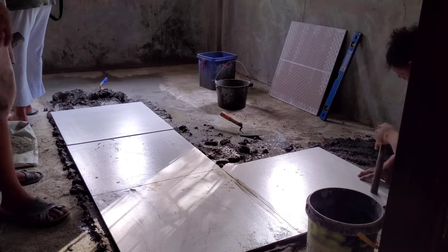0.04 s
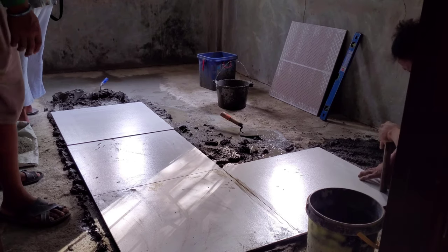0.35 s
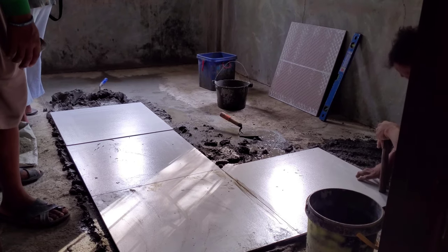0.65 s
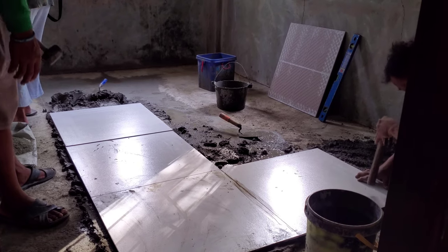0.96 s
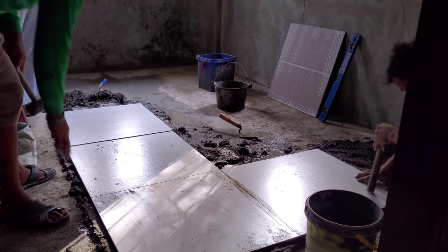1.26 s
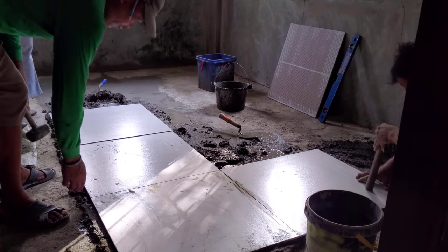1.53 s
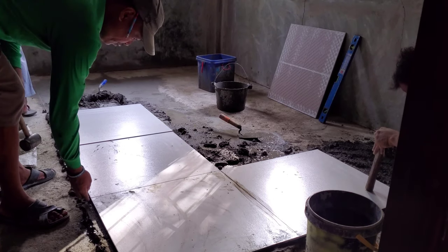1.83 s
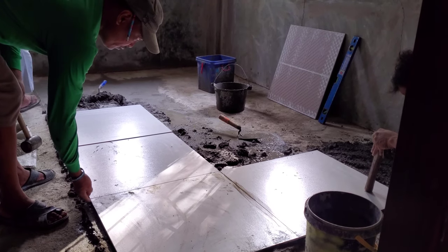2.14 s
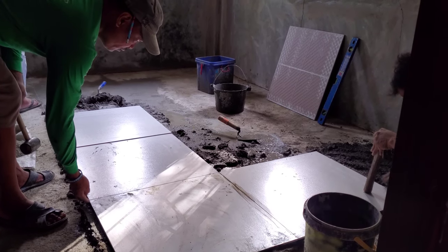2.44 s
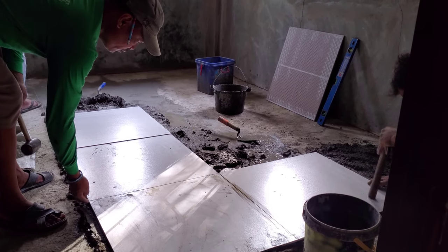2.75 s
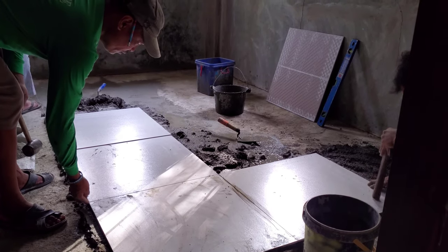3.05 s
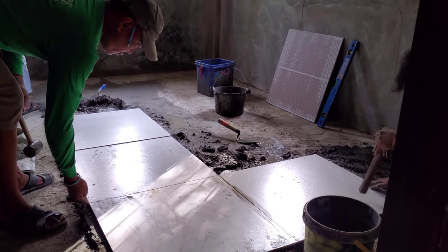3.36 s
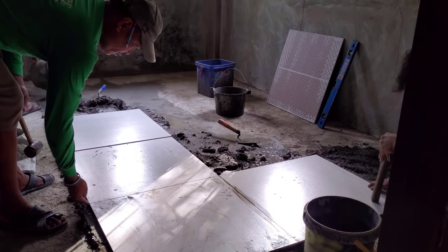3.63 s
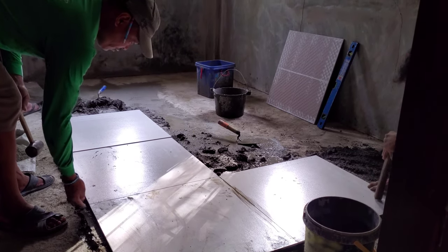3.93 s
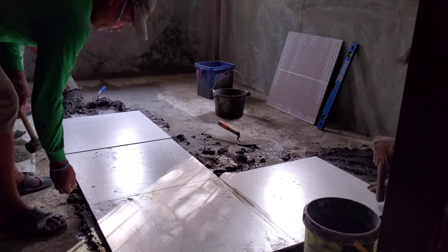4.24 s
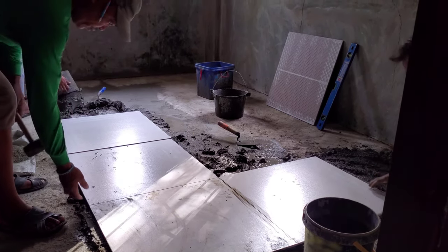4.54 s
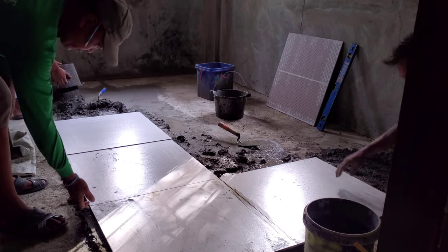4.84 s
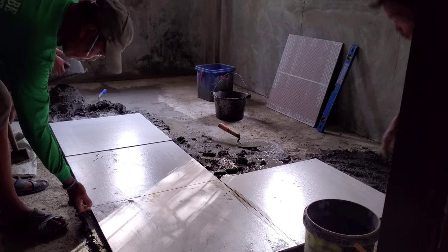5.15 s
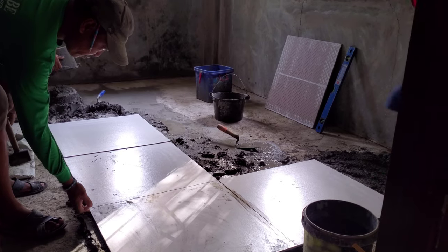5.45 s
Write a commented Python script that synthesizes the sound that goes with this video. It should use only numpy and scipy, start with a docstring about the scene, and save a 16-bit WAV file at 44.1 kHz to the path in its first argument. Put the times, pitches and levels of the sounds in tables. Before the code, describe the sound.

A hammer taps a floor tile into wet cement in two quick runs, with mortar scraping and a final ringing steel clank.

```python
"""In a bare concrete room, a hammer taps a floor tile down into wet cement in a quick run of knocks.
In the pause that follows, mortar is scraped smooth and a power tool whines faintly far away.
A second run of knocks, with more scraping, sounds duller as the tile settles into its bed.
At the end the hammer is laid down with soft bumps, and a steel tool clanks and rings on the floor.
A low rumble from outside and a faint hiss go on the whole time."""
import sys
import numpy as np
from scipy import signal
from scipy.fft import rfft, irfft
from scipy.io import wavfile

SR = 44100
rng = np.random.default_rng(int(sys.argv[2]) if len(sys.argv) > 2 else 0)


def master_out(mix):
    """Clip the mix to full scale and print it as 16-bit PCM to the path in sys.argv[1]."""
    frames = np.transpose(np.atleast_2d(mix))
    ceiling = np.clip(frames, -1, 1)
    pcm = np.round(ceiling * 32767).astype(np.int16)
    wavfile.write(sys.argv[1], SR, pcm)


N = 246519
TIME = np.arange(N) / SR

# Hammer blows. Each row: start in seconds, level in dB, extra level of squeezed sand in dB.
KNOCKS = [(0.04, -4, 9), (0.352, -5.5, 2), (1.035, -5, -1.5), (1.266, -7.5, 1), (1.4524, -7.5, -5),
          (2.783, -3, -8), (3.032, -6, -8), (3.267, -4, 0), (3.506, -4, 4.5), (3.708, -5.5, 1),
          (3.912, -6, -2), (4.09, -9, 5)]
# The middle pitches of a knock's thud, body, clack and crack, in Hz.
COLOUR_HZ = [250, 550, 1200, 3500]
# The hammer head is rested on the tile. Each row: start in seconds, level in dB.
TOUCHES = [(0.733, -44), (0.741, -20.5), (0.752, -31.5)]
# Things are laid down. Each row: start in seconds, level in dB, extra level of hollow ring in dB.
BUMPS = [(4.527, -25.5, -14), (4.573, -34, -9.5), (4.748, -28.5, 3.5), (4.761, -20, -11),
         (4.803, -23.5, -11), (4.829, -30, -6.5), (5.44, -45.5, 0)]
# A steel tool hits the floor. Each row: start in seconds, level in dB.
CLANKS = [(4.928, -19.5), (4.932, -3), (4.954, -19.5)]
# Mortar strokes. Each row: start in seconds, length in seconds, level in dB, extra level of rasp in dB.
STROKES = [(0.33, 0.25, -36.5, 1.5), (1.635, 0.22, -45.5, -1.5), (1.95, 0.13, -55, -0.5),
           (2.149, 0.2, -35, -17), (2.952, 0.07, -39, -13), (3.14, 0.22, -49.5, -4),
           (3.737, 0.48, -37.5, -23), (4.157, 0.28, -40.5, -5), (4.503, 0.13, -42, -2.5),
           (4.591, 0.12, -37.5, 6.5), (4.706, 0.2, -39.5, -9), (5.181, 0.059, -38.5, -12),
           (5.412, 0.19, -47, -13.5)]

# A spectrum says how strong a sound is at each pitch. Each row: pitch in Hz, level in dB.
TILE_SPECTRUM = [(25,-57.5), (45,-42), (70,-16), (100,-18), (150,-7.5), (215,-2.5), (310,0.5), (400,-8.5),
                 (700,-16.5), (1150,-11.5), (1900,-15.5), (2450,-23.5), (3500,-25.5), (4500,-36.5),
                 (5900,-41), (7500,-52.5), (15000,-66.5)]   # a tile on its damp bed
SAND_SPECTRUM = [(2000, -51), (4000, 2), (5800, -8), (8000, 7), (14000, 2), (16000, -30)]   # grit under the tile
TOUCH_SPECTRUM = [(59, -42.5), (100, -47), (251, 3.5), (289, -10), (538, -8.5), (819, -16.5), (1180, -5),
                  (5280, -36), (12000, -60), (15600, -80), (22000, -120)]   # the hammer head settling
CLANK_SPECTRUM = [(60,-38), (250,5), (420,-5), (650,-4), (1050,-9), (1500,-3.5), (2200,-11), (3300,0),
                  (4100,-6), (5500,-4.5), (7000,-22.5), (8100,-33), (10100,-18.5), (11000,-49), (15200,-47)]   # steel cracking against concrete
SCRAPE_SPECTRUM = [(88, -29), (150, -26.5), (182, 11), (201, -13), (248, 1), (352, 1.5), (411, -10),
                   (561, -15), (1150, -21.5), (4480, -21.5), (15500, -32.5)]   # mortar being smoothed
RASP_SPECTRUM = [(600, -21), (1400, -17), (2200, -10.5), (3200, -13), (5000, -17.5), (12000, -27.5)]   # mortar under harder pressure
AIR_SPECTRUM = [(15, -52), (25, -3.5), (116, -0.5), (297, -26), (666, -23.5), (848, -24), (945, -22),
                (1200, -37), (1710, -17), (2010, -35), (2560, -22.5), (3090, -36), (15500, -36.5)]   # background rumble and hiss

# Modes are the notes a struck thing rings at. Each row: pitch in Hz, level in dB, seconds to fade 60 dB.
FLOOR_MODES = [(75.3, -32, 0.81), (107.6, -28.5, 0.75), (216.5, -22, 0.6), (256.4, -19, 0.51),
               (326.1, -14, 0.34), (398.6, -28.5, 0.59), (415.5, -25, 0.48), (478, -24.5, 0.72),
               (525, -31.5, 0.56), (789.6, -21, 0.25), (1540, -21.5, 0.057)]   # the floor slab booms
LOOSE_TILE_MODES = [(912, -29.5, 0.65), (1026, -30.5, 0.71), (1030, -23, 0.72), (1157, -21, 0.67),
                    (1190, -43, 0.42)]   # a tile not yet bedded down rings hollow
PING_MODES = [(2813, -35.5, 0.047), (3248, -31.5, 0.086), (3350, -24, 0.019), (3600, -44.5, 0.09),
              (3680, -45, 0.061)]   # the hammer pings on the glaze
BUMP_MODES = [(209, 7.5, 0.054), (273, -29, 0.011)]   # the low thud of a bump
HOLLOW_MODES = [(480, -4.5, 0.046), (600, -6.5, 0.093), (706, 5, 0.011), (858, -4, 0.067)]   # the hollow ring of a bump
STEEL_MODES = [(2830, -27, .6), (3200, -23, .45), (3292, -16, .6), (3376, -15, .62), (3887, -13, .6),
               (4810, -17, .35), (4903, -12, .6), (5453, -24, .35), (7100, -25, .3), (7191, -21, .47),
               (8780, -31, .42), (12050, -40, .25), (13400, -37, .28), (13590, -38, .3), (14330, -41, .2)]   # the steel's ring, heard directly and fading slowly

# The tones in the motor's whine. Each row: multiple of the lowest pitch, level in dB.
WHINE_TONES = [(1, -3), (2, 2), (3, -17)]
# How long the room rings on. Each row: pitch in Hz, seconds to fade 60 dB.
ROOM_FADE = [(80, 0.9), (250, 0.79), (600, 0.73), (1500, 0.57), (4000, 0.61), (8000, 0.59), (15000, 0.47)]
# How loud the room rings. Each row: pitch in Hz, level in dB above the direct sound.
ROOM_LEVEL = [(60, 9), (130, 4.5), (250, 1), (600, 9.5), (1200, 10.5), (3500, 11), (8000, 9.5), (15000, 13)]
# Echoes from the near walls. Each row: delay in seconds, level in dB.
WALL_ECHOES = [(.0045, -10.5), (.0195, -5.5), (.0228, -3), (.0305, -11)]
# How alike the two ears hear. Each row: pitch in Hz, likeness (1 is the same, 0 is unrelated).
EAR_LIKENESS = [(100, .99), (250, 0.94), (500, 0.76), (1000, 0.4), (2000, -0.033), (4000, 0.012),
                (8000, -0.085)]


def hammer_knocks(room, blow_db=3.5, boom_db=-1.4, ping_db=-7, sand_level_db=-48.5, sand_fade_s=0.011):
    """Each blow is a dull hit that rings tile and floor and squeezes sand; the tile slowly beds down."""
    tile_peak = np.abs(pulse(TILE_SPECTRUM)).max()
    blows, boom, ring, sand = np.zeros((4, N + SR))
    body_db, usual_blow_db = 1.9, -4.5
    for blow_number, (start, db, sand_db) in enumerate(KNOCKS):
        clack_db = 2.5 - 0.39 * blow_number   # the tile clacks less as it beds down
        ring_db = 5.5 - 3 * blow_number   # and its hollow ring is choked
        crack_db = 1.35 * (db - usual_blow_db)   # a harder blow cracks brighter
        colour_db = np.array([0, body_db, clack_db, crack_db]) + rng.standard_normal(len(COLOUR_HZ))
        spot = list(zip(COLOUR_HZ, colour_db))   # every spot struck sounds slightly different
        hit = np.convolve(pulse(TILE_SPECTRUM, spot), crunch(grit_db=-8.5, grit_fade_s=0.0054))
        blow = plate_smear(hit, width_hz=510, count=7) / tile_peak
        seating = 1 + 0.00713 * rng.standard_normal()   # each blow shifts the tile, and so its pitch
        ping = ringing(varied(PING_MODES, scatter_db=3.0), seating)
        slab = signal.fftconvolve(pulse(spot), ringing(varied(FLOOR_MODES, scatter_db=1.6)))[:SR]
        at = round(start * SR)
        blows[at:at + len(blow)] -= from_db(db + blow_db) * blow
        blows[at:at + SR] += from_db(ping_db) * ping   # alike under light and hard blows
        boom[at:at + SR] += from_db(db + boom_db) * slab
        ring[at:at + SR] += from_db(db + ring_db) * ringing(LOOSE_TILE_MODES, seating)
        sand[at:at + SR] += from_db(db + sand_db + sand_level_db) * np.exp(-TIME[:SR] / sand_fade_s)
    fizz = coloured(sand[:N] * rng.standard_normal(N), SAND_SPECTRUM)
    return convolve(blows[:N] + fizz, room) + ring[:N] + boom[:N]


def crunch(grit_db, grit_fade_s, rise_s=0.00015):
    """A click, then a quick swell of crushed sand that is never twice the same."""
    t = TIME[:SR // 20]
    grit = rng.standard_normal(len(t)) * np.exp(-t / grit_fade_s) * (1 - np.exp(-t / rise_s))
    return signal.unit_impulse(len(t)) + from_db(grit_db) * unit_energy(grit)


def plate_smear(sound, width_hz, count):
    """Each pitch crosses a plate at its own speed, so a click is smeared but keeps its colour."""
    radius = np.exp(-np.pi * width_hz / SR)
    for hz in (np.arange(count) + rng.random(count)) * 9000 / count:
        poles = np.array([1, -2 * radius * np.cos(2 * np.pi * hz / SR), radius * radius])
        sound = signal.lfilter(poles[::-1], poles, sound)   # delays the pitches near hz
    return sound


def varied(modes, scatter_db):
    """Each spot struck makes some notes louder and others softer."""
    return np.array(modes) + scatter_db * rng.standard_normal((len(modes), 1)) * np.array([0, 1, 0])


def steel_clank(room, crack_db=6.0, ring_db=0.5):
    """Steel meets concrete: a hard crack and a bright ring."""
    crack = plate_smear(short_hits(CLANKS, CLANK_SPECTRUM), width_hz=125, count=24)
    ring = convolve(clicks(*np.transpose(CLANKS)), steel_ring())
    return from_db(crack_db) * convolve(crack, room) + from_db(ring_db) * ring


def steel_ring(swell_s=0.0054, twin_db=-5):
    """Each note wobbles against a weaker twin close in pitch, differently at each ear."""
    t, ring = TIME[:SR], np.zeros((2, SR))
    for hz, db, fade_s in STEEL_MODES:
        phase = 2 * np.pi * rng.random() + np.array([[0], [np.pi / 2]])
        note = np.sin(2 * np.pi * hz * t + phase)   # standing waves put the ears out of step
        twin_hz = hz + rng.uniform(8, 24, (2, 1)) * rng.choice([-1, 1], (2, 1))
        twin = np.sin(2 * np.pi * (twin_hz * t + rng.random((2, 1))))
        ring += from_db(db - 60 * t / fade_s) * (note + from_db(twin_db) * twin)
    return ring * (1 - np.exp(-t / swell_s))


def soft_bumps():
    """Things laid down thud softly, some with a hollow ring; they are too small to make deep bass."""
    starts, db, hollow_db = np.transpose(BUMPS)
    thud = convolve(clicks(starts, db), ringing(BUMP_MODES))
    hollow = convolve(clicks(starts, db + hollow_db), ringing(HOLLOW_MODES))
    return signal.sosfilt(signal.butter(2, 120, "high", fs=SR, output="sos"), thud + hollow)


def hammer_rest():
    """The hammer head settles on a sandy tile with a dull scuff."""
    return convolve(short_hits(TOUCHES, TOUCH_SPECTRUM), crunch(grit_db=4.0, grit_fade_s=0.018))


def mortar_scraping(level_db=-11.5, grain_db=2.5):
    """Sand grains slide under each stroke; pressing harder adds a rasp."""
    slide, rasp = np.zeros((2, N))
    for start, length, db, rasp_db in STROKES:
        speed = np.sin(np.pi * np.clip((TIME - start) / length, 0, 1))
        slide += from_db(db) * speed
        rasp += from_db(db + rasp_db) * speed
    spiky_noise = rng.standard_normal((2, N)) * from_db(grain_db * rng.exponential(1, (2, N)))
    grains = np.sqrt(N) * unit_energy(spiky_noise)
    scrape = coloured(slide * grains[0], SCRAPE_SPECTRUM) + coloured(rasp * grains[1], RASP_SPECTRUM)
    return from_db(level_db) * scrape


def power_tool(start_s=1.4, length_s=1.5, fade_s=0.21, pitch_hz=903, sag_hz_per_s=44, level_db=-67):
    """A far motor fades in, sinks slowly in pitch under load and fades out."""
    age = TIME - start_s
    phase = 2 * np.pi * np.cumsum(pitch_hz - sag_hz_per_s * age) / SR
    flutter_db = np.interp(TIME, np.linspace(0, TIME[-1], 100), rng.standard_normal(100))
    fade = np.clip(np.minimum(age, length_s - age) / fade_s, 0, 1)
    whine = sum(from_db(db) * np.sin(multiple * phase) for multiple, db in WHINE_TONES)
    return from_db(level_db + flutter_db) * fade * np.sqrt(2) * whine


def room_response(build_s=0.0076, left_db=1.0, far_ear_db=-2.0):
    """A click in the room: the direct sound, echoes off near walls, and a wash that dies band by band."""
    t, response = TIME[:SR], np.zeros((2, SR))
    hz, noise = stereo_noise(SR)
    edges_hz = np.geomspace(30, 17000, 28)
    for low, high in zip(edges_hz, edges_hz[1:]):
        centre = np.sqrt(low * high)
        fade = from_db(-60 * t / at_hz(ROOM_FADE, centre)) * (1 - np.exp(-t / build_s))
        band = unit_energy(irfft(noise * ((hz >= low) & (hz < high)), SR) * fade)
        response += band * np.sqrt(2 * (high - low) / SR) * from_db(at_hz(ROOM_LEVEL, centre))
    response[:, 0] += from_db([0, far_ear_db])   # the direct sound
    for k, (delay, db) in enumerate(WALL_ECHOES):
        at, first_ear = round(delay * SR), k % 2
        response[first_ear, at] += from_db(db)
        response[1 - first_ear, at + rng.integers(2, 9)] += from_db(db)
    return response * from_db([[left_db / 2], [-left_db / 2]])


def background_air(level_db=-52):
    """Low rumble from outside and a faint hiss."""
    _, noise = stereo_noise(N)
    return from_db(level_db) * coloured(irfft(noise, N), AIR_SPECTRUM)


def stereo_noise(size):
    """Pitches and spectra of left and right noise, alike in the bass and unrelated in the treble."""
    hz = np.fft.rfftfreq(size, 1 / SR)
    shared, opposite = np.exp(2j * np.pi * rng.random((2, len(hz))))
    alike = np.clip(at_hz(EAR_LIKENESS, hz), -1, 1)
    ears = np.sqrt(1 + alike) * shared + np.sqrt(1 - alike) * opposite * np.array([[1], [-1]])
    return hz, np.sqrt(size / 2) * ears


def ringing(modes, pitch_ratio=1):
    """The fading notes of a struck thing; every other one starts by swinging the opposite way."""
    t = TIME[:SR]
    return sum((-1) ** k * from_db(db - 60 * t / fade_s) * np.sin(2 * np.pi * hz * pitch_ratio * t)
               for k, (hz, db, fade_s) in enumerate(modes))


def short_hits(events, spectrum):
    """Short hits with no echo, all of one tone colour."""
    shape = pulse(spectrum)
    return convolve(clicks(*np.transpose(events)), shape / np.abs(shape).max())


def clicks(times, levels_db):
    """One click for each contact."""
    track = np.zeros(N)
    track[np.round(np.asarray(times) * SR).astype(int)] = from_db(levels_db)
    return track


def pulse(*spectra, size=4096):
    """The shortest tap whose spectrum is these dB curves added together."""
    hz = np.fft.rfftfreq(size, 1 / SR)
    gain = from_db(sum(at_hz(spectrum, hz) for spectrum in spectra))
    cepstrum = irfft(np.log(gain))   # folding this onto its first half packs the sound at the start
    cepstrum[1:size // 2] *= 2
    cepstrum[size // 2 + 1:] = 0
    return irfft(np.exp(rfft(cepstrum)))


def coloured(noise, spectrum):
    """Give noise the tone colour of a spectrum."""
    return convolve(noise, unit_energy(pulse(spectrum)))


def convolve(sound, response):
    """Pass a sound through a response, such as a room's, in mono or stereo."""
    return signal.fftconvolve(np.atleast_2d(sound), np.atleast_2d(response), axes=1)[:, :N]


def at_hz(table, hz):
    """Read between the rows of a pitch table, giving every octave equal space."""
    pitches, values = np.transpose(table)
    return np.interp(np.log(np.maximum(hz, 1)), np.log(pitches), values)


def unit_energy(sound):
    """Scale a sound so that its squared samples add up to one in an average channel."""
    return sound / np.sqrt(np.mean(np.sum(sound ** 2, axis=-1)) + 1e-20)


def from_db(db):
    """Turn decibels into a number to multiply by."""
    return 10 ** (np.asarray(db) / 20)


def scene(bump_room_db=-6.0, bump_near_db=-11):
    """The tiling work shares one bare room; the bumps are nearest, so more of them arrives directly."""
    room, bumps = room_response(), soft_bumps()
    small_sounds = convolve(hammer_rest() + from_db(bump_room_db) * bumps + mortar_scraping(), room)
    work = hammer_knocks(room) + steel_clank(room) + small_sounds + from_db(bump_near_db) * bumps
    return work + power_tool() + background_air()


def record(dry, cutoff_hz=15800):
    """Round off the loudest peaks and cut the highest treble."""
    rounded = dry / (1 + dry ** 6) ** (1 / 6)
    return signal.sosfilt(signal.ellip(10, .1, 80, cutoff_hz, fs=SR, output="sos"), rounded)


dry = scene()
out = record(dry)
master_out(out)
```